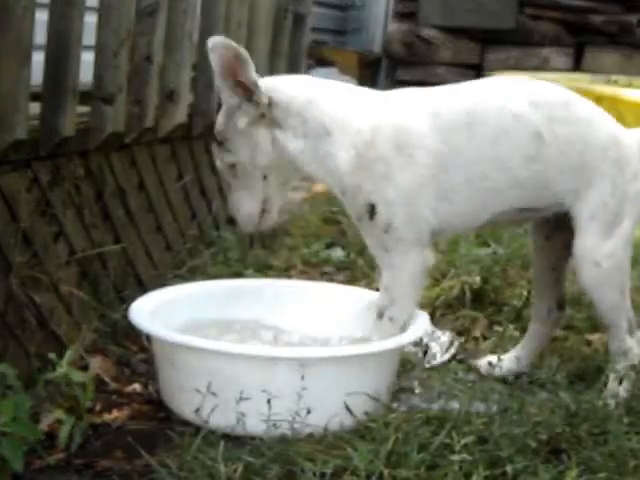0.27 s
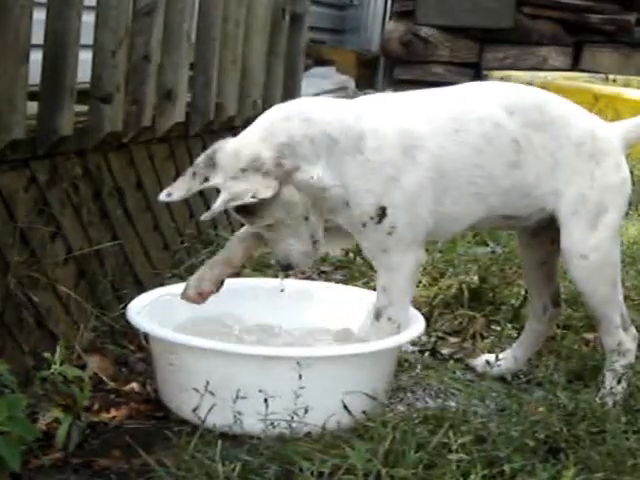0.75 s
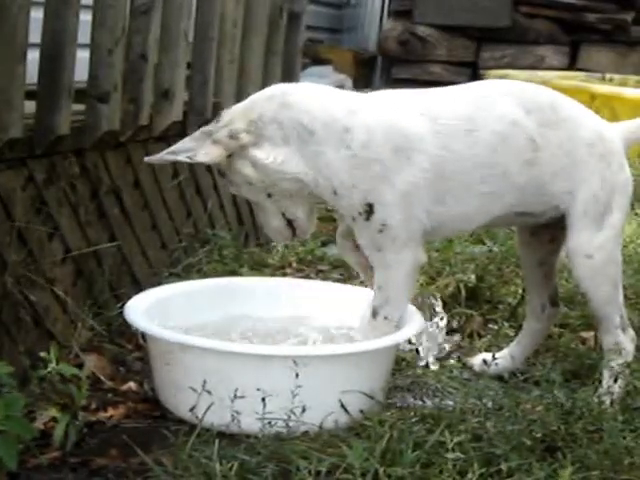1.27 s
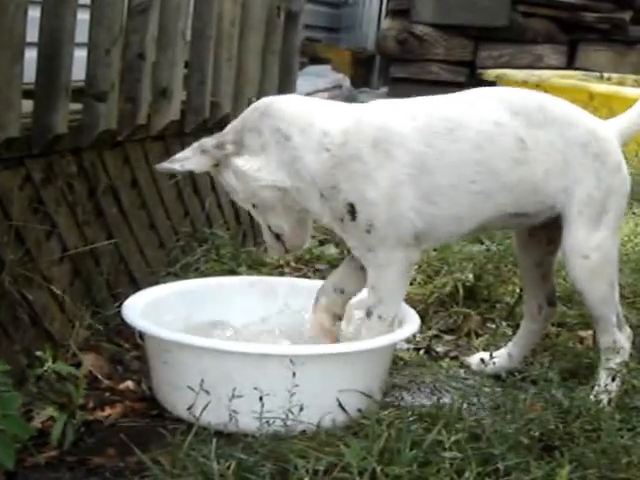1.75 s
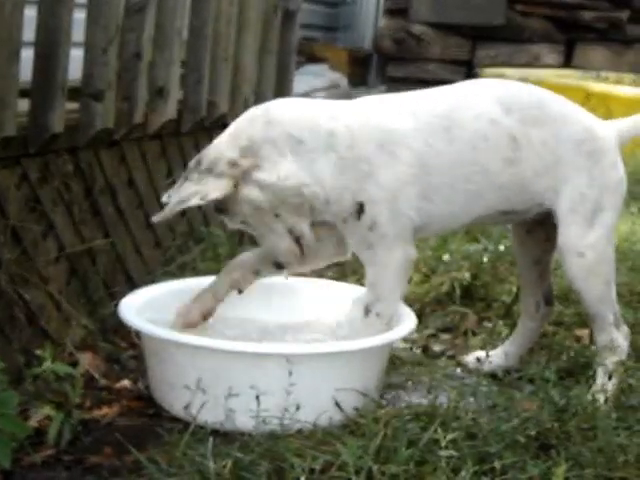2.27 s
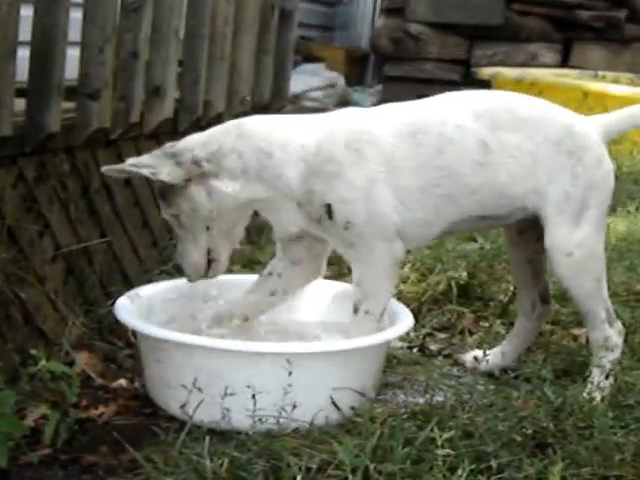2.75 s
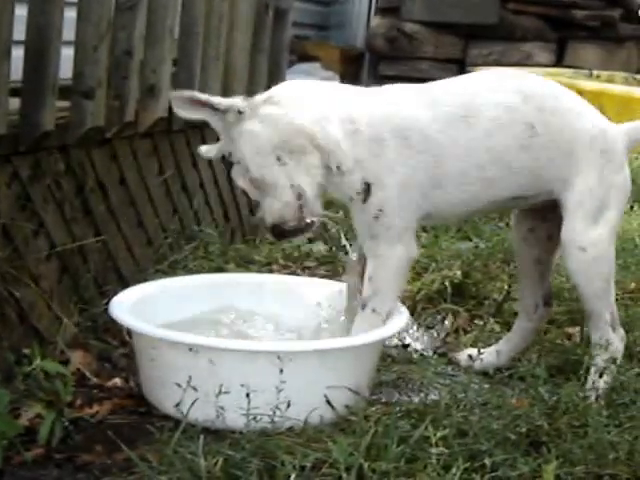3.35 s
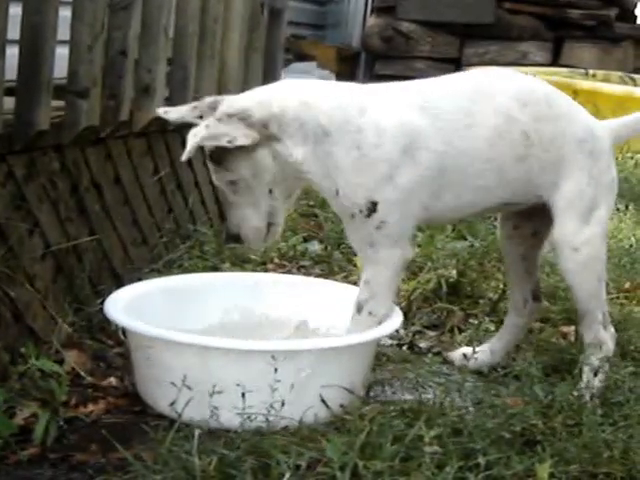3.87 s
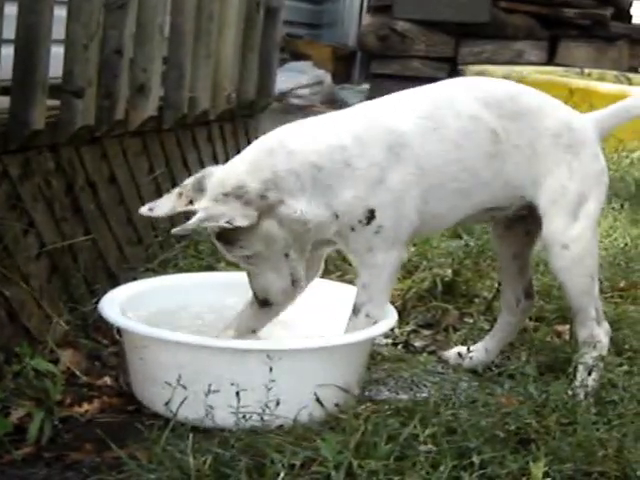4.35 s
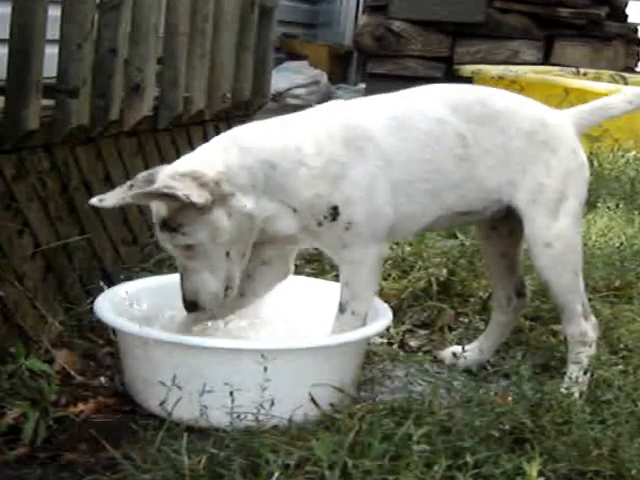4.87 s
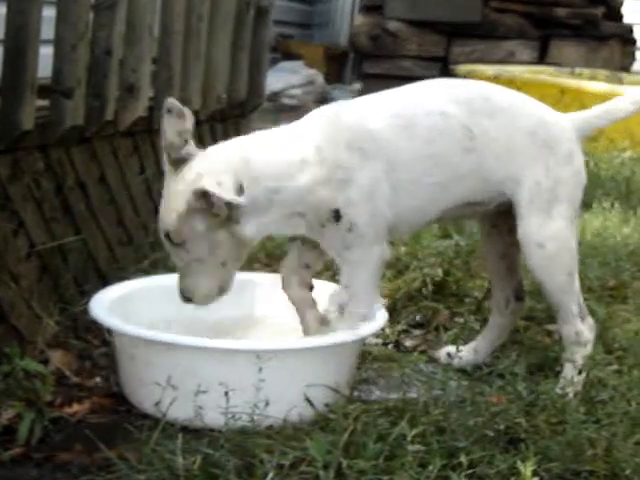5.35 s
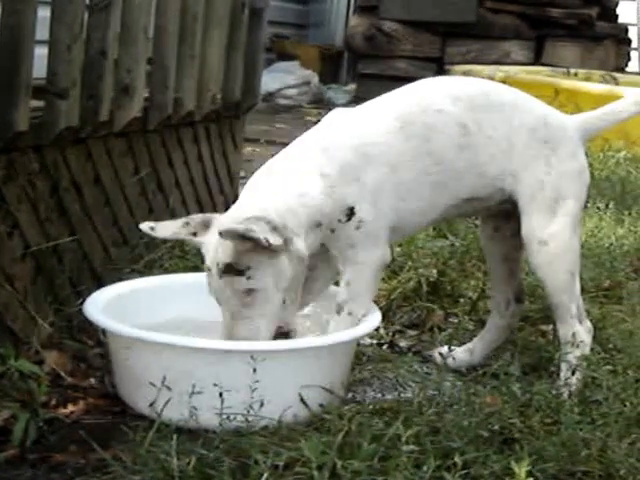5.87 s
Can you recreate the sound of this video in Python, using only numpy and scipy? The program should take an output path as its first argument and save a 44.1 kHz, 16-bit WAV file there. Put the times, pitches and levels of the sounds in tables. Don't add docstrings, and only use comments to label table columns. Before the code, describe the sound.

A dog's paw stirs and slaps water in a plastic tub on grass. Soft gurgles come first, then sharp splashes, plops and crackling spray in irregular clusters, with short lulls between them. Drops ping and tick as they fall back. Behind lies a faint low fan hum, dull yard noise, hiss and light wind bumps. A small camera a few metres away gives a slightly crunchy, treble-limited sound.

```python
import sys
import numpy as np
from scipy import signal
from scipy.fft import rfft, irfft
from scipy.io import wavfile
from scipy.ndimage import uniform_filter1d, minimum_filter1d

SR = 44100
rng = np.random.default_rng(int(sys.argv[2]) if len(sys.argv) > 2 else 0)


def unload_audio(sound):
    columns = np.transpose(np.atleast_2d(sound))
    steps = np.round(np.clip(columns, -1, 1) * 32767)
    wavfile.write(sys.argv[1], SR, steps.astype(np.int16))


def boost(x):
    u = np.asarray(x, float) / 20
    return 10 ** u


N = 269892

# start [s], peak level [dB], pitch [Hz], t60 [ms].
AIR_POCKETS = [(.222, -33.5, 528, 140), (.409, -22.5, 770, 11), (0.432, -33.5, 993, 79),
               (0.4481, -28.5, 926, 59), (0.476, -31, 976, 29), (0.9364, -28, 435, 13),
               (1.2688, -2.5, 856, 8.7), (1.3169, -27.5, 856, 18), (1.3621, -18.5, 948, 24),
               (1.686, -32, 740, 9), (1.7713, -31.5, 750, 19), (1.9757, -30.5, 502, 170),
               (2.0579, -23.5, 923, 14), (2.5624, -25.5, 530, 9.3), (2.836, -29, 690, 14),
               (3.036, -19.5, 315, 130), (3.064, -24, 562, 10), (3.0546, -16, 450, 10),
               (3.519, -28.5, 1070, 25), (3.7439, -30.5, 1200, 34), (4.447, -17, 324, 46),
               (4.928, -31.5, 982, 21), (4.971, -30, 730, 7.4), (4.9719, -28, 1040, 36),
               (5.109, -30, 1027, 14), (5.4409, -24.5, 422, 22), (5.459, -28, 853, 20),
               (5.4723, -26, 684, 16), (5.4775, -25.5, 427, 21), (5.8313, -16.5, 410, 9)]
POCKET_RISE_MS, POCKET_SOFTER_MS_PER_DB = 0.57, 0.15

# start [s], peak level [dB], pitch [Hz], t60 [ms].
MID_BUBBLES = [(.2516, -30.5, 1670, 13), (.2923, -26.5, 2110, 13), (.311, -30.5, 1940, 27),
               (0.364, -31, 1250, 20), (0.3943, -30, 1720, 15), (.4123, -33, 1830, 52),
               (0.439, -35, 1840, 90), (0.4704, -27.5, 1690, 23), (1.0997, -29.5, 1940, 47),
               (1.182, -29, 1500, 15), (1.191, -22, 1650, 11), (1.248, -25.5, 1953, 46),
               (1.369, -22, 1390, 13), (1.376, -28, 980, 34), (1.7851, -27.5, 1310, 24),
               (2.0578, -27, 2390, 13), (2.8373, -31, 1310, 9.8), (3.2661, -32, 1600, 30),
               (3.356, -33, 1560, 59), (3.3758, -32, 1490, 13), (3.412, -28, 2520, 9),
               (3.5862, -25, 3000, 6), (3.6287, -30.5, 1920, 23), (3.636, -28, 2500, 18),
               (3.7156, -25, 1830, 12), (3.7773, -33.5, 1890, 20), (4.392, -23, 1600, 19),
               (4.985, -21, 1870, 11), (5.804, -26, 1490, 14), (5.8255, -18.5, 1290, 12)]
BUBBLE_RISE_CYCLES = 1.93

# start [s], peak level [dB], pitch [Hz], t60 [ms].
RINGING_DROPS = [(0.4848, -23.5, 2700, 14), (1.269, -25, 2530, 9.1), (1.502, -20, 2900, 7.3),
                 (1.5246, -29, 2510, 30), (1.5305, -18, 2620, 5.5), (1.535, -19, 2440, 5.7),
                 (1.6399, -13, 4900, 9.3), (1.6534, -14.5, 2260, 16), (1.686, -25, 2300, 10),
                 (1.7728, -24.5, 2460, 31), (1.7857, -22.5, 2050, 12), (1.807, -17.5, 2250, 6),
                 (2.009, -28.5, 3180, 20), (2.5532, -26, 2240, 11), (2.575, -24.5, 2510, 4.4),
                 (2.8378, -13.5, 2740, 4.9), (2.8484, -20.5, 2180, 6.6), (2.8643, -25, 2160, 8),
                 (2.872, -26, 2710, 7.8), (2.9088, -23, 2380, 16), (2.921, -27, 2540, 18),
                 (2.9757, -29.5, 2380, 35), (3.0362, -7, 2520, 6.2), (3.0785, -22, 2190, 23),
                 (4.447, -29, 2130, 12), (4.6338, -23, 2660, 42), (4.959, -15.5, 2570, 7.4),
                 (4.9719, -13.5, 2093, 22), (5.3429, -26.5, 3180, 21), (5.4395, -24, 2680, 16)]
DROP_RISE_CYCLES = 2.85

# start [s], peak level [dB], pitch [Hz].
TICKING_DROPLETS = [(0.2497, -22, 4000), (0.5926, -21.5, 4400), (0.938, -7, 3380), (1.3318, -25, 3970),
                    (1.368, -16, 2660), (1.4309, -21, 4270), (1.5245, -23, 3800), (1.543, -24, 3600),
                    (1.642, -17, 3960), (1.6444, -15, 4560), (1.7055, -22, 5000), (1.7814, -17.5, 4500),
                    (2.411, -25, 4240), (2.482, -25, 4040), (2.838, -10, 4270), (2.8482, -18, 4960),
                    (2.8655, -21, 3830), (2.871, -16.5, 5000), (3.0377, -12, 4620), (4.9232, -18.5, 3500),
                    (4.9273, -18, 4030), (4.9598, -22, 3700), (4.97, -14.5, 3550), (4.971, -25, 5140),
                    (5.1082, -17.5, 3030), (5.1095, -18, 4230), (5.342, -20, 4020), (5.5456, -7, 4020),
                    (5.5462, -11, 5260), (5.802, -21.5, 4100)]
DROPLET_RISE_CYCLES, DROPLET_RING_CYCLES, DROPLET_CYCLES_PER_DB = 1.3, 5, 1.0

BROOD_LEAD_MS, BROOD_SPAN_MS, BROOD_PITCH_OCT, BROOD_DB, BROOD_TOP_DB = 7, 22, .55, -9, -21.5

# start [s], rms level [dB], t60 [ms], dull slap against the spray [dB].
SPRAY_BURSTS = [(0.4858, -25, 19, -27), (0.969, -29.5, 52, -12.5), (1.2093, -34.5, 18, -2),
                (1.3292, -29, 21, -11), (1.3685, -39.5, 16, 5.5), (1.4314, -28.5, 9.3, -25),
                (1.5012, -20, 3.8, -30), (1.527, -28.5, 52, -33), (1.6352, -26, 6.5, -20),
                (1.6457, -29.5, 56, -16), (1.663, -34, 13.6, -10), (1.689, -27.5, 12, -10.5),
                (1.771, -34.5, 21, -4), (1.7937, -35, 59, -7), (2.4398, -36, 42, -11),
                (2.4812, -27.5, 18, -11), (2.574, -32.5, 27, -15), (2.837, -30, 12, -2),
                (2.867, -27.5, 26, -31), (3.036, -25, 38, -5.5), (3.3268, -36, 30, -12),
                (3.588, -33, 21, -12), (4.333, -33.5, 37, -25), (4.447, -31, 14, -10),
                (4.9572, -30.5, 170, -14), (4.9712, -25.5, 17, -14), (5.111, -27.5, 11, -2),
                (5.473, -37.5, 43, -2), (5.481, -36.5, 240, -25), (5.5455, -25, 10.8, -26)]
# start [s], rms level [dB].
FAINT_SPITS = [(0.248, -37.5), (0.504, -39), (1.184, -39), (2.64, -48), (2.731, -51), (2.902, -40),
               (5.334, -37.5), (0.874, -36), (1.8056, -46), (1.9706, -37), (2.2224, -36), (2.846, -44),
               (3.411, -36), (3.42, -41), (3.541, -35), (3.614, -34), (3.718, -40), (3.902, -37),
               (4.419, -35), (4.577, -36), (4.925, -34.5), (5.4015, -36), (5.8015, -40), (5.813, -42),
               (5.847, -40)]
SPIT_T60_MS, SPIT_SLAP_DB = 21, -8.5
SPRAY_RISE_MS = 1.2
LEAD_MS, LEAD_DB = 4.2, -11
# frequency [Hz], level [dB].
SPRAY_SPECTRUM = [(500, -36), (1500, -16.5), (2500, 1), (4500, -1.5), (7000, 0.5), (10000, -2.5)]
# frequency [Hz], level [dB].
SLAP_SPECTRUM = [(150, -9), (400, 2), (900, -1), (2000, -3.5), (4000, -17.5)]

# start [s], peak level [dB], pitch [Hz].
FALLING_DROPS = [(.1815, -31, 1895), (.4133, -26.5, 5146), (.488, -23.5, 8890), (.5098, -32, 2390),
                 (.5135, -30, 9600), (.5857, -28, 2500), (0.9684, -26, 4230), (1.0553, -31, 2476),
                 (1.181, -28, 4414), (1.1866, -27, 4048), (1.3641, -28, 3208), (1.4954, -29, 8635),
                 (1.5253, -32, 3747), (1.536, -24.5, 9700), (1.7061, -31, 6934), (1.7933, -25, 2175),
                 (1.796, -24, 5940), (1.8302, -27, 4134), (1.9757, -27, 4156), (2.2478, -29, 1750),
                 (2.4202, -33, 7494), (2.4425, -27, 4100), (2.446, -25, 4240), (2.482, -22.5, 4264),
                 (2.487, -30, 3620), (2.534, -35, 2500), (2.5629, -29, 1970), (2.5751, -30, 5070),
                 (2.6165, -32, 5146), (2.64, -26.5, 3500), (2.7208, -32, 4328), (2.7315, -30, 3530),
                 (2.8995, -28, 2239), (2.9045, -28, 2500), (2.9075, -27, 3250), (2.9346, -26, 2326),
                 (2.96, -28, 2519), (2.986, -31, 2400), (3.323, -30, 2610), (3.36, -32, 4134),
                 (3.4215, -30, 4974), (3.4981, -30, 1766), (3.511, -32, 4070), (3.6372, -31, 3252),
                 (3.7865, -32, 3618), (4.3423, -30, 4700), (4.389, -33, 2600), (4.4616, -32, 4565),
                 (4.4752, -29, 3101), (4.5661, -30, 7063), (4.634, -27, 3250), (5.0015, -29, 2541),
                 (5.0173, -31, 2562), (5.4395, -30, 4770), (5.4476, -33, 4845), (5.548, -22, 8600),
                 (5.7499, -31, 3790), (5.8035, -27, 6100), (5.8313, -28, 2283), (5.848, -31, 3360)]
PING_RISE_MS, PING_T60_MS, PING_CYCLES = 1, 5.4, 2.8
# start [s], peak level [dB], t60 [ms].
FILM_SNAPS = [(0.9388, -21, 10), (1.3685, -22, 16), (1.5002, -11, 2.7), (1.5265, -26, 25), (1.772, -29, 12),
              (1.687, -22, 9), (1.8068, -29, 8), (2.474, -27, 7.4), (2.5635, -26, 8), (2.575, -22, 8),
              (2.8378, -17, 8), (2.848, -22, 12), (2.8649, -18, 8), (2.8722, -23, 8), (3.511, -32, 8),
              (3.586, -22, 16), (3.7165, -30, 9), (4.4248, -28, 10), (4.9683, -14, 22), (5.1076, -19.5, 16),
              (5.811, -28, 20), (5.831, -24, 12), (5.8465, -24, 14)]
# frequency [Hz], level [dB].
SNAP_SPECTRUM = [(400, -25), (1000, -11), (2500, 2), (5000, 0), (10000, -15)]

# time of strongest stirring [s], strength [dB],
# depth [dB] (deep strokes gurgle, shallow ones fizz).
PAW_STROKES = [(.17, -44.5, 6), (.42, -45, 8.5), (.52, -46.5, 3), (1.0, -46, -7), (1.22, -44, 6.5),
               (1.381, -38.5, 1.5), (1.8, -39.5, 2.5), (2.05, -41, 7.5), (2.44, -40.5, -5), (2.6, -42, 6),
               (2.78, -49, 12), (2.92, -42.5, -1), (3.07, -40.5, 3), (3.38, -41.5, 2.5), (3.58, -38, -1),
               (3.76, -45, 7), (4.4, -42.5, -2), (4.7, -53.5, 10), (4.99, -41, 0), (5.33, -49, 14),
               (5.47, -42, -10), (5.83, -42, -14)]
BUILD_DB_PER_S, SETTLE_DB_PER_S, CALM_DB = 68.5, 76, -53

# frequency [Hz], density [dB per Hz].
YARD_SPECTRUM = [(15, -43.5), (25, -27.5), (125, -5.5), (173, -3), (406, -9), (978, -9), (1320, -16.5),
                 (5960, -20), (8910, -23), (10100, -31.5), (13100, -61), (22000, -120)]
YARD_DB = -38.5
# frequency [Hz], width [Hz], level [dB].
FAN_HUM = [
    (127.33, 1.08, -46.5),
    (108.6, 7.7, -50.5),
]
# time [s], level [dB].
WIND_GUSTS = [(0.0, -46), (0.8, -47), (.93, -36), (1.11, -30), (1.21, -46), (1.38, -37), (1.5, -44.5),
              (4.18, -44), (4.24, -36.5), (4.67, -49.5), (5.06, -41), (5.11, -33.5), (5.2, -41),
              (5.31, -35), (5.4, -42), (6.12, -41)]

# frequency [Hz], threshold against the usual level [dB].
DROPOUT_THRESHOLD = [(1000, -30), (2500, -14), (4000, -9.5), (6000, -6.3), (10000, -5)]
BLOCK_LEAD = 432
EDGE_HZ = 10060


def evened(x):
    return x / np.sqrt(np.mean(x ** 2) + 1e-20)


def smooth_noise(size):
    return evened(uniform_filter1d(rng.standard_normal(N), size=size))


def read(points, hz):
    f, value = np.transpose(points)
    return np.interp(np.log(hz + 1), np.log(f + 1), value)


def along(rows, order):
    return np.interp(np.arange(N) / SR, np.array(rows)[:, 0], np.array(rows)[:, order])


def add(mix, s, sound):
    part = mix[round(s * SR):][:len(sound)]
    part += sound[:len(part)]


def coloured(points):
    gain = boost(read(points, np.fft.rfftfreq(N, 1 / SR)))
    return evened(irfft(rfft(rng.standard_normal(N)) * gain, N))


def swell(t, rise_ms, t60_ms):
    rise = 2 * max(rise_ms, .15) / 1000
    attack = np.sin(np.pi / 2 * np.minimum(t / rise, 1)) ** 2
    return attack * boost(-60 * np.maximum(t - rise, 0) * 1000 / max(t60_ms, 2))


def bubble(hz, rise_ms, t60_ms, glide):
    life_ms = 2 * rise_ms + t60_ms
    t = np.arange(int(150 + SR / 1000 * life_ms)) / SR
    pitch = hz * (1 + glide * np.minimum(t * 1000 / life_ms - .1, .5))
    return swell(t, rise_ms, t60_ms) * np.sin(2 * np.pi * np.cumsum(pitch) / SR)


def plops():
    rows = []
    for s, db, hz, t60_ms in AIR_POCKETS:
        rows.append((s, db, hz, POCKET_RISE_MS - POCKET_SOFTER_MS_PER_DB * db, t60_ms))
    for s, db, hz, t60_ms in MID_BUBBLES:
        rows.append((s, db, hz, BUBBLE_RISE_CYCLES * 1000 / hz, t60_ms))
    for s, db, hz, t60_ms in RINGING_DROPS:
        rows.append((s, db, hz, DROP_RISE_CYCLES * 1000 / hz, t60_ms))
    for s, db, hz in TICKING_DROPLETS:
        ring_cycles = DROPLET_RING_CYCLES - DROPLET_CYCLES_PER_DB * db
        rows.append((s, db, hz, DROPLET_RISE_CYCLES * 1000 / hz, ring_cycles * 1000 / hz))
    out = np.zeros(N)
    for (s, db, hz, rise_ms, t60_ms), luck in zip(rows, rng.random((len(rows), 7))):
        add(out, s - rise_ms / 1000, boost(db) * bubble(hz, rise_ms, t60_ms, 0.34 * luck[0]))
        for when, size, loud in luck[1:].reshape(2, 3):
            brood_s = s + (BROOD_SPAN_MS * when - BROOD_LEAD_MS) / 1000
            brood_db = min(db, BROOD_TOP_DB) + BROOD_DB * (1.0 + loud)
            brood_hz = hz * 2 ** (BROOD_PITCH_OCT * (size - .4))
            add(out, brood_s, boost(brood_db) * bubble(brood_hz, rise_ms, min(t60_ms, 16), 0.33 * loud))
    return out * (1 + .15 * smooth_noise(30))


def spray():
    bright, dull, t = np.zeros(N), np.zeros(N), np.arange(6000) / SR
    spits = [(s, db, SPIT_T60_MS, SPIT_SLAP_DB) for s, db in FAINT_SPITS]
    for s, db, t60_ms, slap_db in list(SPRAY_BURSTS) + spits:
        start = s - SPRAY_RISE_MS / 1000
        add(bright, start, boost(db + 5.0) * swell(t, SPRAY_RISE_MS, t60_ms))
        add(bright, s - 2 * LEAD_MS / 1000, boost(db + LEAD_DB) * swell(t, LEAD_MS, 5.9))
        add(dull, start, boost(db + 5.0 + slap_db) * swell(t, SPRAY_RISE_MS + 0.35, 3.0 * t60_ms))
    grain = boost(3.8 * smooth_noise(40))
    return bright * evened(coloured(SPRAY_SPECTRUM) * grain) + dull * coloured(SLAP_SPECTRUM)


def pings():
    out, gate, t = np.zeros(N), np.zeros(N), np.arange(2000) / SR
    for (s, db, hz), luck in zip(FALLING_DROPS, rng.random((len(FALLING_DROPS), 1))):
        t60_ms = PING_T60_MS + PING_CYCLES * 1000 / hz
        drop = bubble(hz, PING_RISE_MS, t60_ms, 0.22 * luck[0])
        add(out, s - 2 * PING_RISE_MS / 1000, boost(db) * drop)
    for s, db, t60_ms in FILM_SNAPS:
        add(gate, s, boost(db - 6) * swell(t, 0.11, t60_ms))
    return out + gate * coloured(SNAP_SPECTRUM)


def stirring(deep):
    t = np.arange(0, N, 64) / SR
    s, db, depth_db = np.transpose(PAW_STROKES)[:, :, None]
    away_db = np.maximum(BUILD_DB_PER_S * (s - t), SETTLE_DB_PER_S * (t - s))
    shape_db = db + deep * depth_db - away_db
    power = boost(CALM_DB) ** 2 + (boost(shape_db) ** 2).sum(axis=0)
    return np.interp(np.arange(N) / SR, t, np.sqrt(power))


def swarm(low_hz, high_hz, per_s, cycles, spread_db, tilt_db, count=18):
    clump = boost(3.5 * smooth_noise(500))
    born = rng.random(N) < per_s / SR * clump / clump.mean()
    size = born * boost(spread_db * np.minimum(rng.exponential(1, N), 2.4))
    kind, out = rng.integers(0, count, N), np.zeros(N)
    for k, hz in enumerate(np.geomspace(low_hz, high_hz, count)):
        ring = bubble(hz, 1100 / hz, cycles * 1000 / hz, 0.53)
        ring = boost(tilt_db * np.log2(hz / low_hz)) * ring
        out += signal.oaconvolve(size * (kind == k), ring)[:N]
    return evened(out)


def slosh():
    fizz = swarm(2000, 9900, per_s=1100, cycles=24, spread_db=4.0, tilt_db=3.0)
    gurgle = swarm(457.0, 2620, per_s=300, cycles=23.6, spread_db=2.0, tilt_db=0.5)
    return boost(-0.5) * stirring(0) * fizz + boost(-4.0) * stirring(0.98) * gurgle


def fence(x):
    t = np.arange(4000) / SR
    sparse = rng.standard_normal(4000) * (rng.random(4000) < .05)
    taps = sparse * boost(-60 * t / 0.025) * (t > .002)
    return signal.oaconvolve(x, taps / np.linalg.norm(taps))[:N]


def fan():
    hz, out = np.fft.rfftfreq(N, 1 / SR), np.zeros(N)
    for centre_hz, width_hz, db in FAN_HUM:
        resonance = 1 + (2 * (hz - centre_hz) / width_hz) ** 2
        out += boost(db) * evened(irfft(rfft(rng.standard_normal(N)) / resonance, N))
    return out


def wind():
    rumble = coloured([(15, -37.0), (40, 2.0), (90, 4.0), (130, -10.5), (250, -46.5), (1000, -76.5)])
    return boost(along(WIND_GUSTS, order=1) - 4.0) * rumble


def yard():
    return boost(YARD_DB) * coloured(YARD_SPECTRUM)


def scene():
    water = plops() + spray() + slosh()
    echoes = boost(-17.5) * fence(water)
    behind = yard() + fan() + wind()
    return (water + echoes + behind + pings())[None]


def treble_dropouts(x, size=256, count=8):
    n, k = np.arange(2 * size)[:, None] + .5, np.arange(size) + .5
    window = np.sin(np.pi * n / size / 2) * np.sqrt(2 / size)
    basis = np.cos(np.pi / size * (n + size / 2) * k) * window
    padded = np.pad(x, (BLOCK_LEAD, 2 * size))
    frames = np.lib.stride_tricks.sliding_window_view(padded, 2 * size)[::size]
    blocks = (frames @ basis).reshape(len(frames), -1, count)
    band_db = 10 * np.log10((blocks ** 2).mean(axis=2) + 1e-14)
    usual_db = uniform_filter1d(band_db, size=60, axis=0)
    over_db = band_db - usual_db
    splash_db = -minimum_filter1d(-over_db, size=count + 1, axis=0)
    splash_db = uniform_filter1d(splash_db, size=5, axis=1)
    wander = uniform_filter1d(rng.standard_normal(over_db.shape), size=3, axis=0)
    wander = evened(uniform_filter1d(wander, size=3, axis=1))
    band_hz = k[count // 2::count] * SR / size / 2
    cut_db = read(DROPOUT_THRESHOLD, band_hz) + .66 * splash_db + 1.7 * wander
    lone_db = 10 * np.log10(blocks ** 2 + 1e-14) - (usual_db + cut_db)[..., None]
    kept = (over_db > cut_db)[..., None] | (lone_db > 4)
    parts = (blocks * np.maximum(kept, boost(-34))).reshape(-1, size) @ basis.T
    joined = parts[1:, :size] + parts[:-1, size:]
    return joined.ravel()[BLOCK_LEAD - size:][:N]


def roll_off(x):
    return signal.sosfilt(signal.butter(12, 11280, fs=SR, output="sos"), x)


def record(dry):
    overloaded = 1.115 * np.tanh(dry[0] / 1.09)
    edge = signal.firwin(801, EDGE_HZ, window=("kaiser", 9), fs=SR)
    narrow = signal.oaconvolve(treble_dropouts(overloaded), edge, "same")
    return roll_off(narrow[None])


dry = scene()
out = record(dry)
unload_audio(out)
```